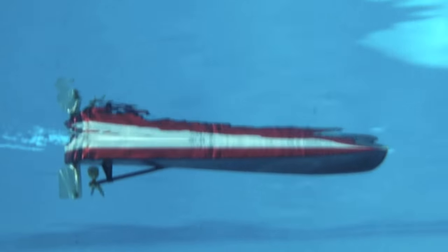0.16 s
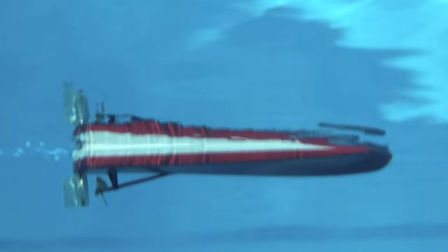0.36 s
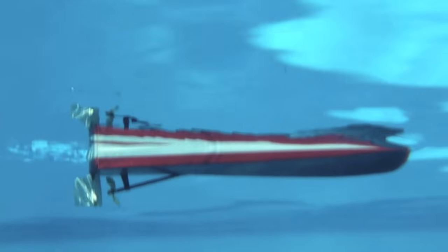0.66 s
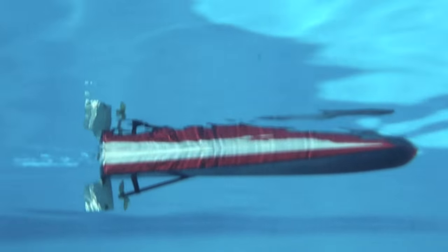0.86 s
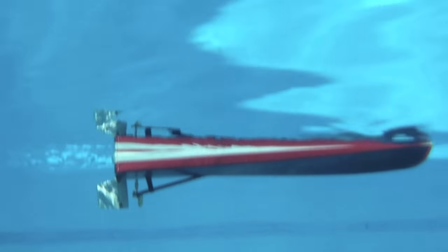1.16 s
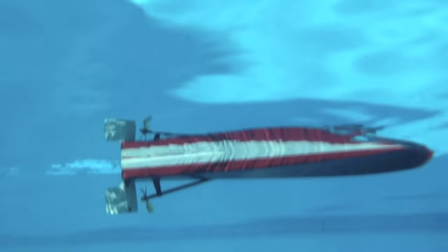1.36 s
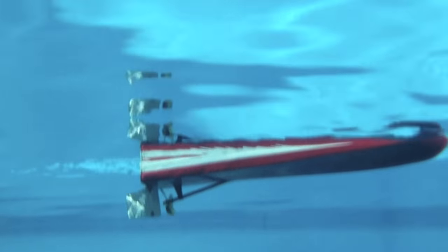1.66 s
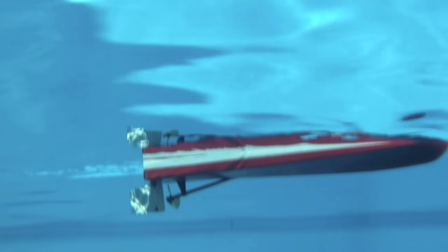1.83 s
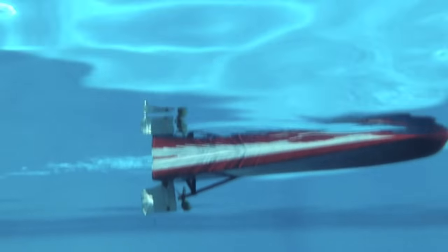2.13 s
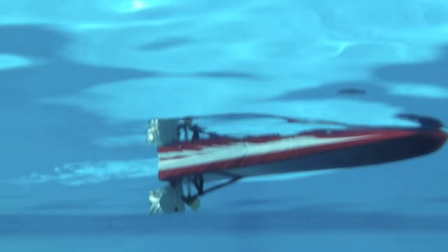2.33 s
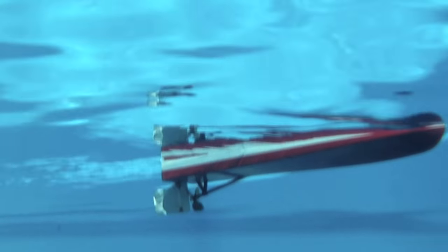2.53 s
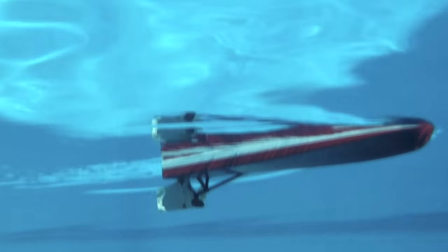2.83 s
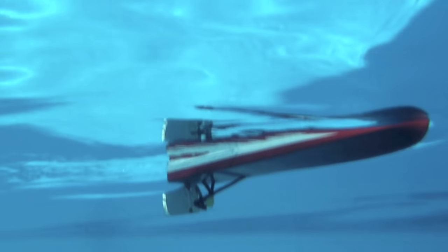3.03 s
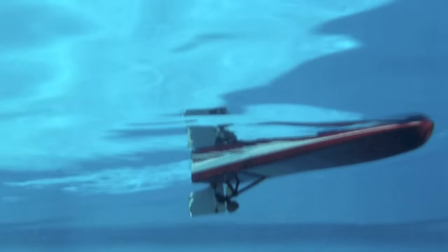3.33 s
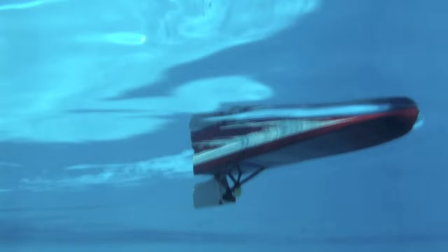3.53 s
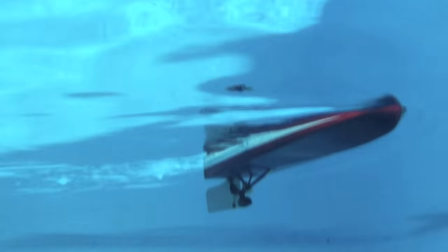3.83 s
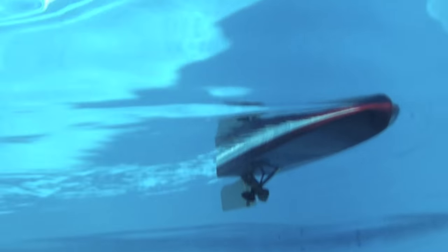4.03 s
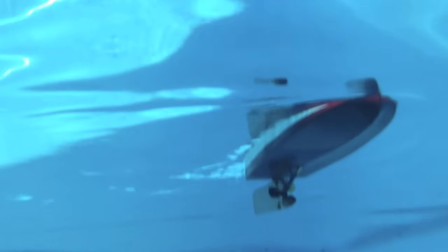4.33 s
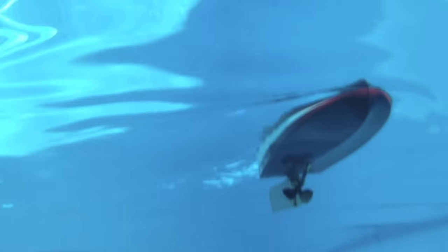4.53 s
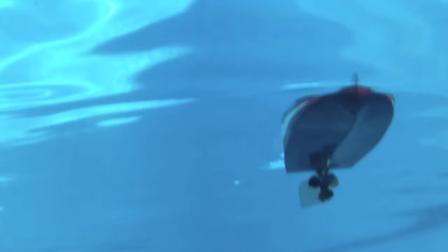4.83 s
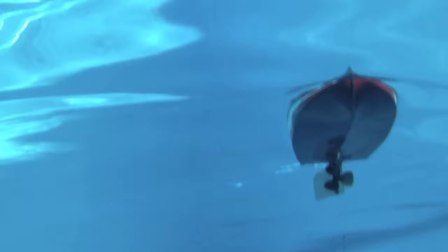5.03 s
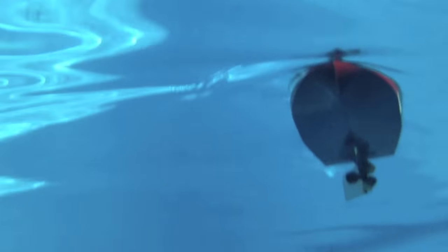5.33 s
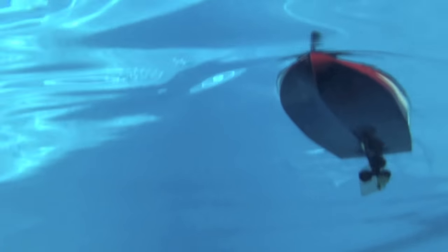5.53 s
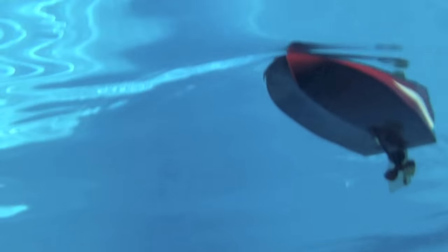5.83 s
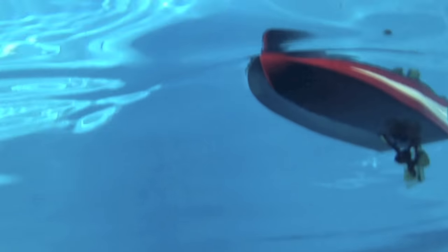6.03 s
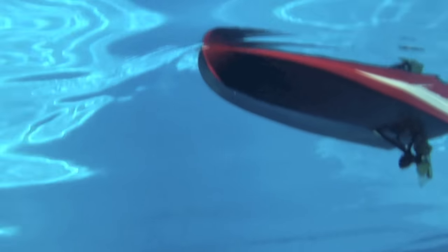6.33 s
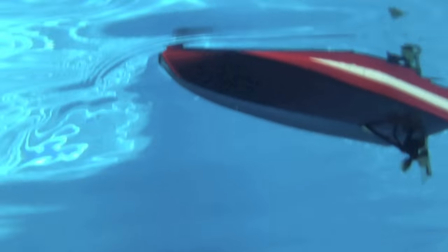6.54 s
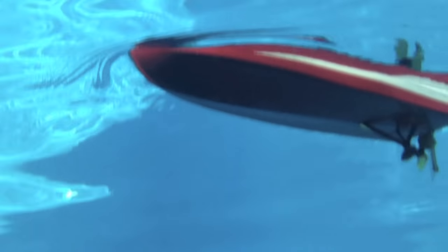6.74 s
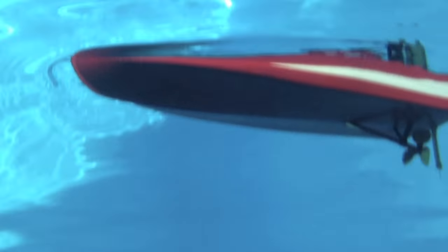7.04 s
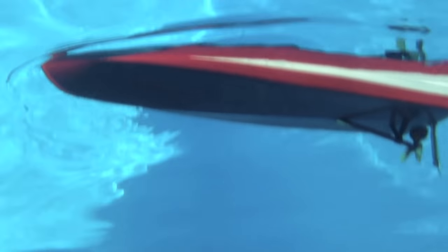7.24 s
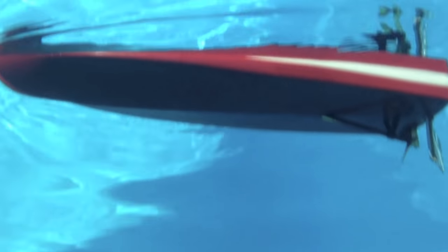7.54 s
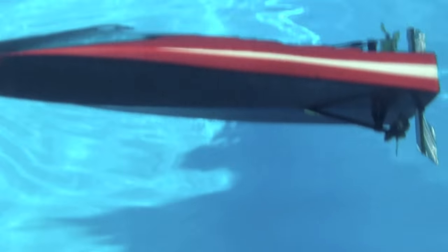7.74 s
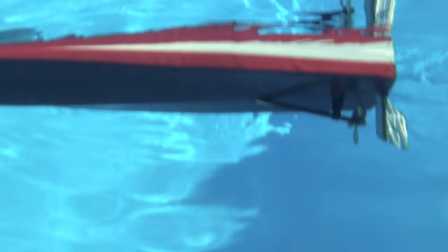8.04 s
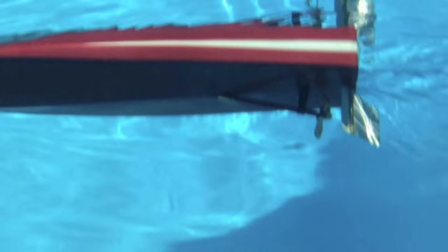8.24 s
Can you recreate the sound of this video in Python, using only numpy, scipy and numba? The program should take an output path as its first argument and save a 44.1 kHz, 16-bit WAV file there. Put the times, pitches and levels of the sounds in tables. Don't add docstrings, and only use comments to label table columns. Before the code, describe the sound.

Loud dull knocks and low thumps on a waterproof housing underwater, over a soft water rumble and a faint throbbing toy boat motor whirr.

```python
import sys
import numpy as np
from scipy import signal
from scipy.fft import rfft, irfft
from scipy.io import wavfile
from scipy.ndimage import uniform_filter1d, minimum_filter1d
from numba import njit

SR = 44100
rng = np.random.default_rng(int(sys.argv[2]) if len(sys.argv) > 2 else 0)


def makeup_ratio(level_db):
    decades = np.asarray(level_db, float) / 20
    return 10 ** decades


def dump_mix(stems):
    frames = np.atleast_2d(stems).T
    limited = np.clip(frames, -1, 1)
    pcm = np.round(limited * 32767).astype(np.int16)
    wavfile.write(sys.argv[1], SR, pcm)


N = 369657


def unit(x):
    return x / np.sqrt(np.mean(x ** 2))


def walk(rate_hz):
    hold = int(SR / rate_hz)
    levels = np.repeat(rng.standard_normal(N // hold + 1), hold)
    return 1.47 * uniform_filter1d(uniform_filter1d(levels, hold), hold)[:N]


def coloured(points):
    hz, db = np.transpose(points)
    f = np.maximum(np.fft.rfftfreq(N, 1 / SR), 1)
    db = np.interp(np.log(f), np.log(hz), db)
    db = db - 40 * np.maximum(np.log10(hz[0] / f), 0)
    return irfft(rfft(rng.standard_normal(N)) * makeup_ratio(db) * np.sqrt(SR / 2), N)


def rings(modes):
    out = 0
    for hz, width, db in modes:
        b, a = signal.iirpeak(hz, hz / width, SR)
        once = signal.lfilter(b, a, rng.standard_normal(N))
        out = out + makeup_ratio(db) * unit(signal.lfilter(b, a, once))
    return out


def curves(table):
    s, *columns = np.transpose(table)
    return [np.interp(np.arange(N) / SR, s, c) for c in columns]


def add(out, s, sound):
    i = int(s * SR)
    out[i:i + len(sound)] += sound[:N - i]


def water():
    # pitch_hz [Hz], level_db [dB per Hz]
    rumble_colour = [(20, -21.5), (40, -2.5), (70, 1.5), (120, -0.5), (180, -2), (225, -9), (265, -22.5),
                     (320, -29), (450, -48)]
    # peak_s [s, centre of the swell], rise_db [dB over the calm], half_length_s
    # [s]
    surges = [
        (0.0, 4.5, .22),
        (1.03, 4, .22),
        (2.25, 6.5, .5),
        (3.43, 4, .3),
        (4.3, 2.5, .2),
        (6.48, 5, .2),
        (7.22, 4.5, .3),
        (7.99, .8, .15),
    ]
    t = np.arange(N) / SR
    surge = sum(db * np.exp(-((t - s) / half) ** 2) for s, db, half in surges)
    calm_db = -48.5
    return unit(coloured(rumble_colour)) * makeup_ratio(calm_db + surge + 2.3 * walk(14))


def motor():
    # start_s [s], level_db [dB], load on the shaft [0-1]
    whirr_path = [(0.0, -63, .1), (0.51, -61.5, .05), (1.28, -64, .05), (1.96, -62, .9), (2.29, -64, .9),
                  (3.36, -63.5, .3), (3.73, -64, .35), (4.57, -65.5, .8), (5.55, -63, .75),
                  (5.9, -63.5, .95), (6.4, -61.5, .65), (6.67, -64, .4), (7.82, -62.5, .6), (8.38, -63, .7)]
    # pitch_hz [Hz], level_db [dB per Hz]
    whirr_colour = [(300, -35), (476, -23), (650, -22.5), (850, -14.5), (1100, -7.5), (1460, -12.5),
                    (2060, -12.5), (2400, -9), (2720, -3), (3300, -2.5), (4450, -8.5), (5800, -12),
                    (8000, -16), (15300, -26)]
    # pitch_hz [Hz], width_hz [Hz], level_db [dB]
    hull_modes = [(526, 36, -15.5), (593, 57, -12.5)]
    shaft_modes = [(988, 31, -20.5), (1322, 90, -11.5)]
    strut_modes = [(684, 54, -15), (1168, 54, -16.5), (1566.5, 71, -16.5), (1919, 54, -21.5)]
    gear_modes = [(3063, 99, -16.5), (4996, 200, -9.5), (5250, 59, -8), (5290, 490, -9), (7460, 200, -20),
                  (12400, 400, -23.5)]

    db, load = curves(whirr_path)
    shaft_db = -2 + 10 * load
    strut_db = 5 - 7.5 * load
    throb_hz, sag_hz_per_s, peak_s = 4.105, .0255, 4.738
    t = np.arange(N) / SR - peak_s
    angle = 2 * np.pi * t * (throb_hz - sag_hz_per_s * t / 2) + .2 * walk(2)
    turn = np.cos(angle) + 0.28 * np.cos(2 * angle + 0.57)
    db = db + 0.69 * walk(18)
    broad = unit(coloured(whirr_colour)) * makeup_ratio(1.5 * turn + .8 * walk(12))
    gears = rings(gear_modes) * makeup_ratio(3.4 * turn + 1.2 * walk(20))
    hull = rings(hull_modes) * makeup_ratio(0.3 + 3.1 * turn + 3.9 * walk(11))
    shaft = rings(shaft_modes) * makeup_ratio(shaft_db + 3.2 * turn + 2.6 * walk(16))
    strut = rings(strut_modes) * makeup_ratio(strut_db + 1.6 * turn + 2.4 * walk(11))
    return makeup_ratio(db) * (broad + gears + hull + shaft + strut)


def circuit():
    # pitch_hz [Hz], level_db [dB per Hz]
    hiss_colour = [(300, -100), (2000, -112), (6000, -111), (9500, -112), (11000, -116), (12500, -113),
                   (15300, -118)]
    # pitch_hz [Hz], level_db [dB]
    clock_tones = [(3002, -80), (4000, -84), (6000, -88), (10000, -95)]
    t = np.arange(N) / SR
    hiss = coloured(hiss_colour) * makeup_ratio(1.2 * walk(14))
    tones = sum(makeup_ratio(db + 4 * walk(7)) * np.sin(2 * np.pi * hz * t) for hz, db in clock_tones)

    blip_hz, blip_s = 14000, .093
    beat = (t / blip_s).astype(int)
    sounding = (rng.random(beat[-1] + 1) < .65)[beat]
    gate = sounding * np.exp(-((t / blip_s % 1 - .5) / .12) ** 2)
    blip_level = makeup_ratio(-70 - .8 * t) * (.07 + gate * np.where(t < 4.5, 1, .4))
    return hiss + tones + blip_level * np.sin(2 * np.pi * blip_hz * t)


def blows():
    # start_s [s], peak_db [dB], shell_hz [Hz],
    # push_hardness_hz [Hz], crack_db [dB over the thump]
    rap_rows = [
        (0.0764, -16.5, 190, 640, -12),
        (0.8953, -20.5, 199, 261, -27),
        (1.171, -3.3, 179, 595, -12),
        (1.9078, -3.5, 225, 190, -34),
        (2.7246, -15, 175, 520, -23),
        (6.058, -33, 219, 320, -8),
        (6.4725, -12, 210, 132, -32),
        (7.3338, -11, 182, 520, -18),
        (5.5595, -44, 230, 300, -1),
    ]
    # start_s [s], peak_db [dB], shell_hz [Hz], push_hardness_hz [Hz]
    tap_rows = [
        (1.459, -21.5, 183, 310),
        (3.255, -26.4, 172, 380),
        (3.501, -12.5, 143, 154),
        (3.9473, -26.5, 184, 240),
        (4.1906, -28.5, 182, 297),
        (5.2993, -22.5, 190, 208),
        (6.9872, -30.5, 208, 242),
        (7.7443, -24.5, 185, 358),
    ]
    pat_rows = [
        (0.659, -34.5, 242, 326),
        (0.843, -39, 227, 141),
        (1.7658, -37.5, 230, 227),
        (2.0207, -30, 135, 130),
        (5.4194, -39.5, 201, 301),
        (5.7635, -39.5, 207, 583),
    ]
    thump_rows = [
        (1.9262, -1.7, 200, 133),
        (3.5359, -1.8, 193, 182),
        (4.4743, -1.5, 191.4, 131),
        (4.807, -10.5, 196, 158),
        (6.601, -10.5, 175, 135),
        (7.2729, -2, 192.7, 136),
        (7.2946, -21, 215, 240),
    ]
    nudge_rows = [
        (0.69, -31.5, 100, 50),
        (1.9517, -28, 101, 84),
        (3.1803, -36, 99, 239),
        (6.91, -36, 100, 97),
        (6.9214, -33, 118, 71),
        (2.1357, -29, 136, 272),
    ]
    shove_rows = [
        (3.5105, -10.5, 136, 128),
        (6.4829, -21.5, 100, 168),
        (7.309, -26, 103, 307),
    ]
    # start_s [s], peak_db [dB], shell_hz [Hz], push_hardness_hz [Hz], crack_db [dB]
    slam_row = (2.1639, 0.7, 162.7, 700, -22)
    # start_s [s], peak_db [dB], shell_hz [Hz]
    bounce_rows = [
        (2.186, -10, 188),
        (2.1916, -5, 165),
        (2.2152, -13.9, 225),
        (2.2301, -9.5, 190),
        (2.2603, -11.5, 198),
        (2.2863, -25, 185),
        (2.297, -17.5, 205),
        (2.3244, -29.5, 208),
    ]
    padded_crack_db, loose_q = -42, 9
    rows = [(*row, 3.2) for row in rap_rows]
    rows += [(*row, -18, 4.6) for row in pat_rows]
    rows += [(*slam_row, loose_q)]
    rows += [(*row, 260, padded_crack_db, loose_q) for row in bounce_rows]
    for kind, q in [(tap_rows, 3.3), (thump_rows, 5.9), (nudge_rows, 4.6), (shove_rows, 1.2)]:
        rows += [(*row, padded_crack_db, q) for row in kind]
    return rows


def thump(hz, q, push_hz, crack_db, noise, size=4096):
    f = 1j * np.fft.rfftfreq(size, 1 / SR)
    low, s = f / 127, f / hz
    walls = (low ** 2 / (1 + low / .84 + low ** 2)) ** 2
    shell = walls * s / q / (1 + s / q + s ** 2)
    body = -irfft(shell / (1 + f / push_hz) ** 8, size)

    contact = makeup_ratio(-34) * noise * np.exp(-np.arange(size) / (0.012 * SR))
    contact[0] = 1
    edge = f / 330 / (1 + f / 330) / (1 + f / (380 + 1.75 * push_hz)) ** 5
    crack = irfft(shell * edge * rfft(contact), size)
    late = int(SR * max(1.1 / push_hz - .002, 0))
    return body / np.abs(body).max() + makeup_ratio(crack_db) * np.roll(crack, late) / crack[:90].max()


def knocks():
    # start_s [s], peak_db [dB], shell_hz [Hz], push_hardness_hz [Hz]
    pull_row = (6.5875, 1.2, 166, 135)
    out, rows = np.zeros(N), blows()
    last, *noises = rng.standard_normal((len(rows) + 1, 4096))
    for (s, db, hz, push_hz, crack_db, q), noise in zip(rows, noises):
        add(out, s, makeup_ratio(db) * thump(hz, q, push_hz, crack_db, noise))
    s, db, hz, push_hz = pull_row
    add(out, s, -makeup_ratio(db) * thump(hz, 4.6, push_hz, -42, last))

    t = np.arange(N) / SR - 2.166
    fade = (t > 0) * np.clip((.088 - t) / .008, 0, 1)
    rattle = fade * makeup_ratio(-70 * t.clip(0) + 3.36 * walk(90))
    buzz = unit(coloured([(300, 10.5), (700, -9), (1200, -15), (1650, -17), (2000, -29),
                          (3300, -31), (6000, -55)]))
    return out + makeup_ratio(-33) * rattle * buzz


def ticks():
    # start_s [s], peak_db [dB]
    tick_rows = [
        (0.85, -51),
        (1.095, -45),
        (1.5424, -36),
        (1.561, -39),
        (1.5993, -50),
        (2.9833, -44),
        (4.4403, -40),
        (5.914, -45),
        (6.4, -47),
    ]
    out = np.zeros(N)
    fade = np.exp(-np.arange(256) / 50)
    for s, db in tick_rows:
        noise = rng.standard_normal(256)
        soft = uniform_filter1d(uniform_filter1d(noise, size=5), size=4)
        add(out, s, makeup_ratio(db - 5) * soft * fade)
    return out


def bubbles():
    bubble_rows = [
        (2.024, 900, -0.092, 0.016, -56),
        (2.204, 1493, .12, 0.025, -47),
        (4.430, 2750, 0.04, .025, -59.5),
        (6.467, 1300, 0.016, .016, -55),
        (7.728, 3040, -.01, .14, -60.5),
        (6.19, 1545, .01, 0.11, -65),
    ]
    out = np.zeros(N)
    for s, hz, glide, length, db in bubble_rows:
        t = np.arange(int(length * SR)) / SR
        tone = np.sin(2 * np.pi * hz * t * (1 + glide * t / length / 2))
        add(out, s, makeup_ratio(db) * np.hanning(len(t)) * tone)
    return out * makeup_ratio(4 * walk(120))


def scene():
    return (water() + motor() + circuit() + knocks() + ticks() + bubbles())[None]


@njit
def recover(want, rise):
    g, out = 1., np.empty(len(want))
    for i in range(len(want)):
        g = min(want[i], g + (1 - g) * rise)
        out[i] = g
    return out


def band_limit(x):
    return signal.sosfilt(signal.butter(12, 15320, fs=SR, output="sos"), x)


def record(dry):
    ceiling_db, release_s, top_hz = -3.1, 0.8, 15400
    want = np.minimum(makeup_ratio(ceiling_db) / (np.abs(dry[0]) + 1e-9), 1)
    want = minimum_filter1d(want, size=49)
    gain = uniform_filter1d(recover(want, 1 / (release_s * SR)), size=13)
    lowpass = signal.ellip(11, .1, 60, top_hz, fs=SR, output="sos")
    held = signal.sosfilt(lowpass, dry * gain)
    return band_limit(held)


dry = scene()
out = record(dry)
dump_mix(out)
```